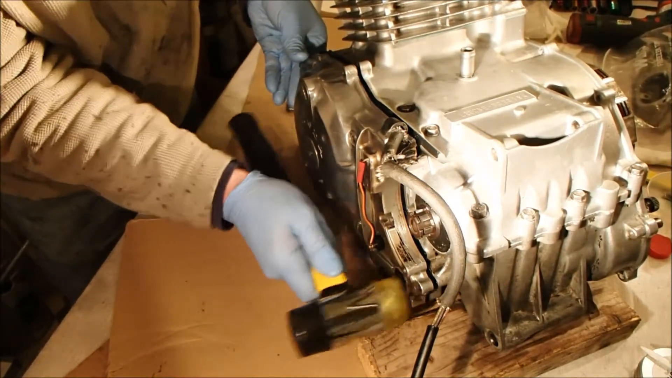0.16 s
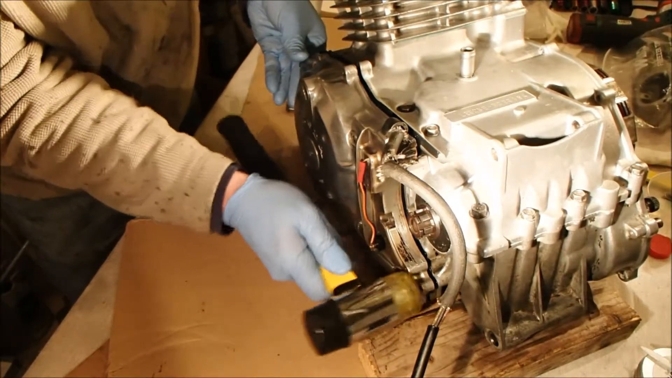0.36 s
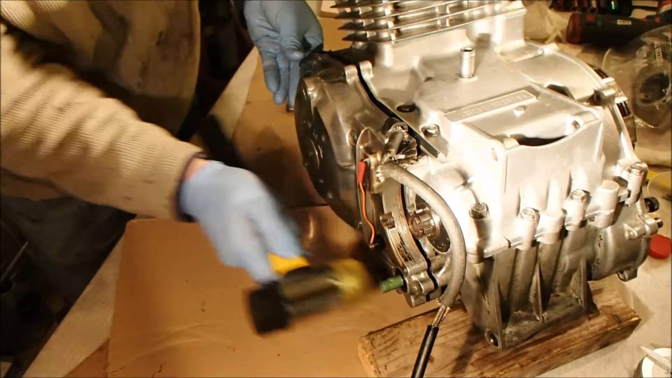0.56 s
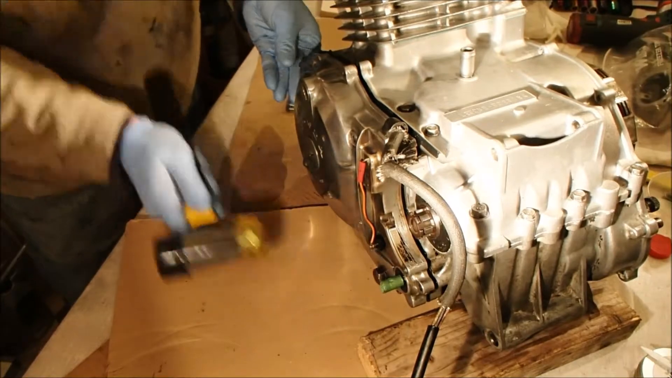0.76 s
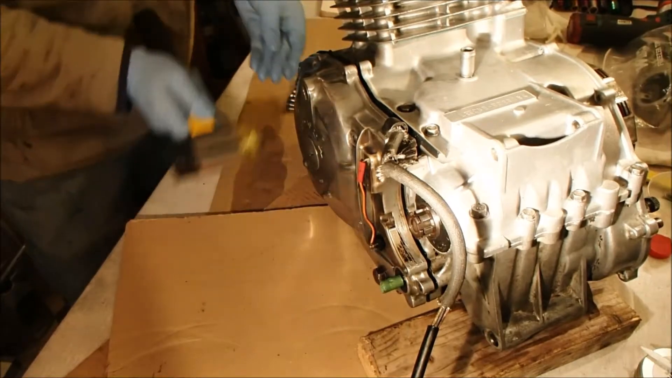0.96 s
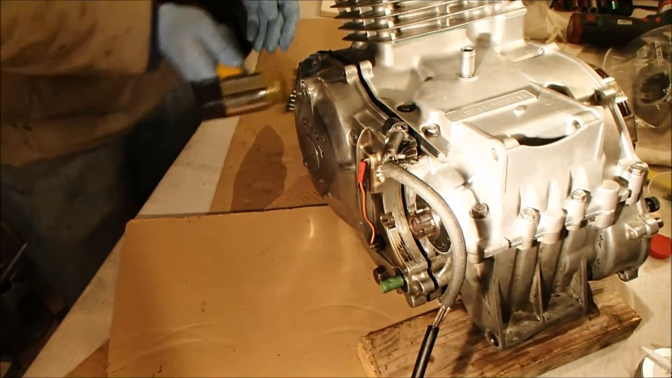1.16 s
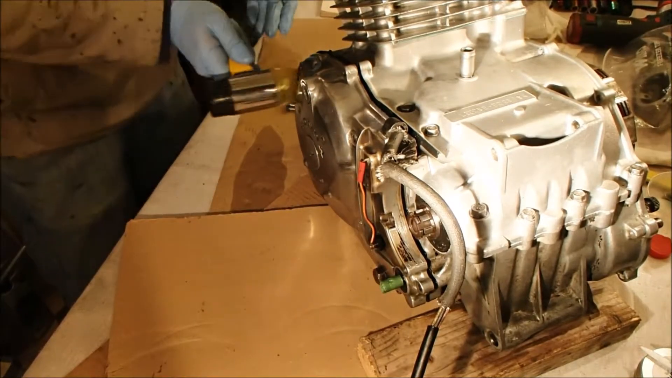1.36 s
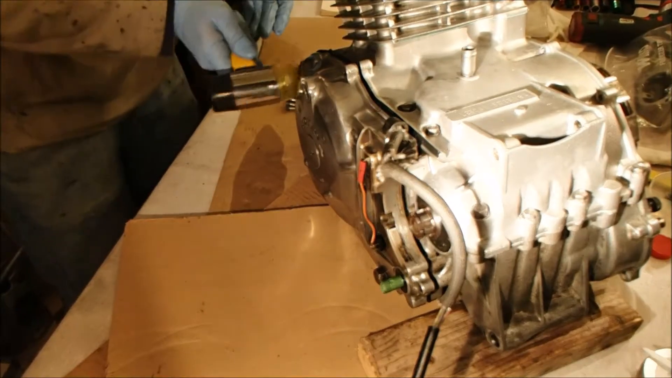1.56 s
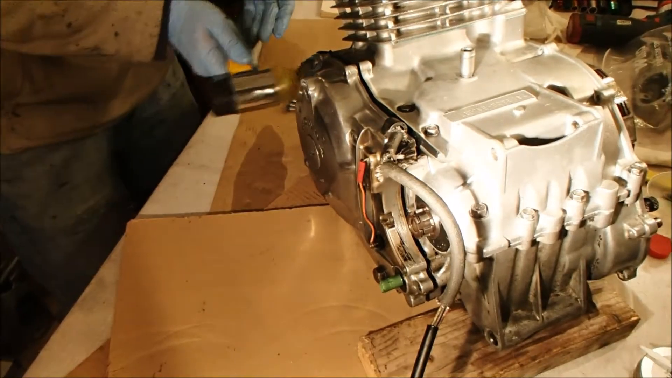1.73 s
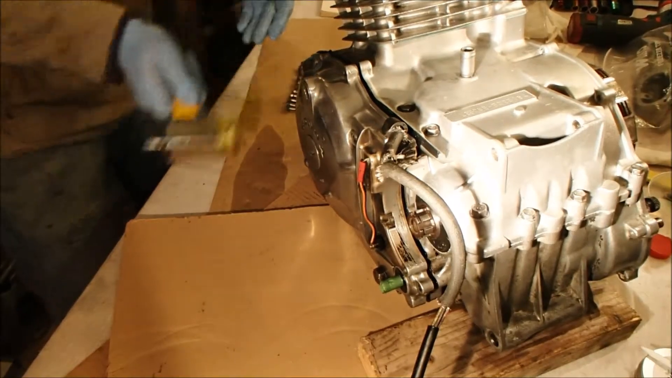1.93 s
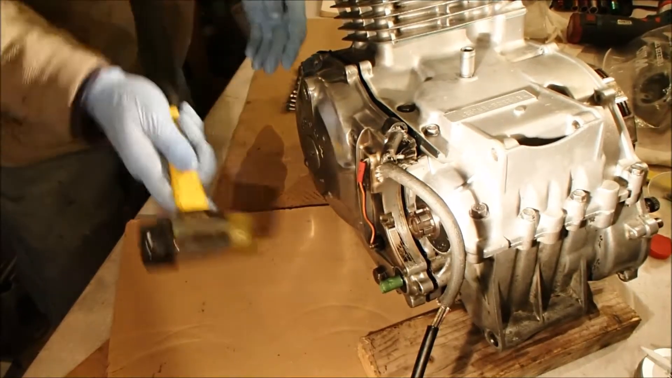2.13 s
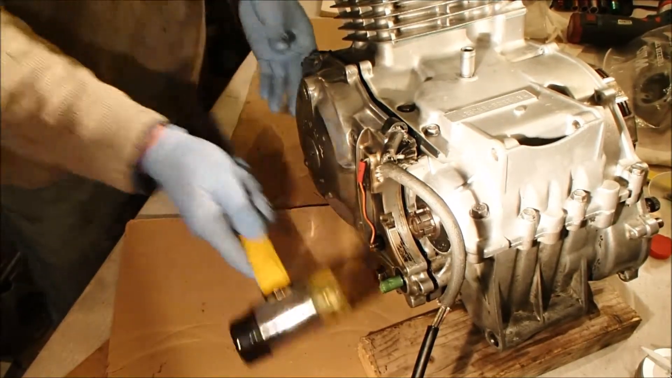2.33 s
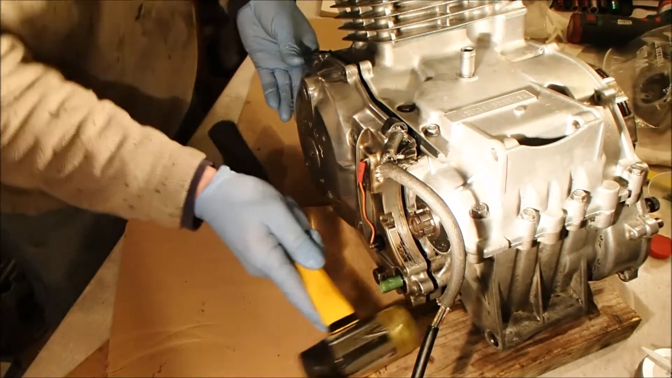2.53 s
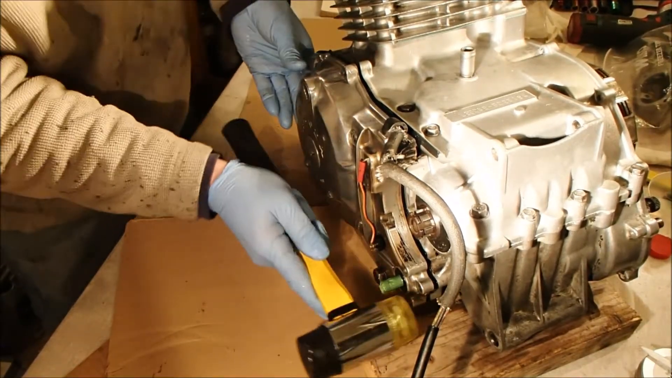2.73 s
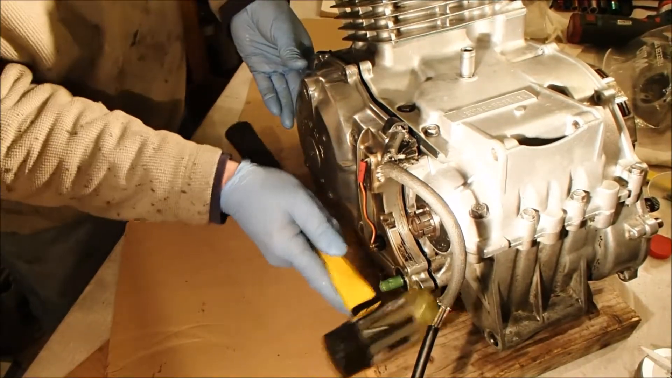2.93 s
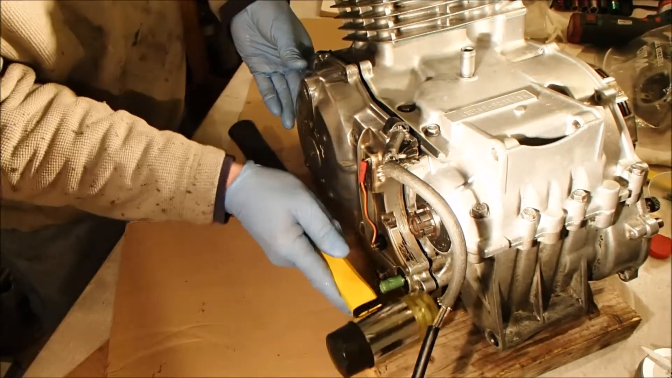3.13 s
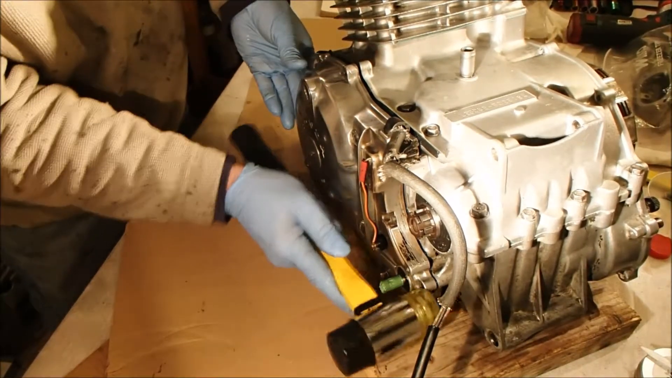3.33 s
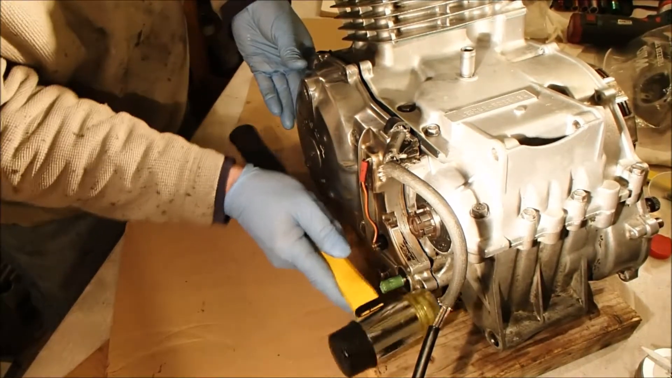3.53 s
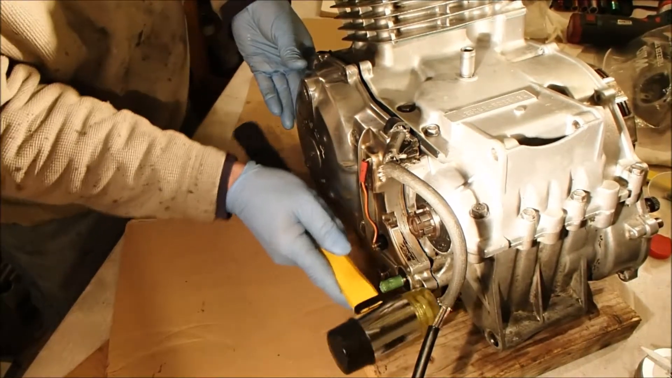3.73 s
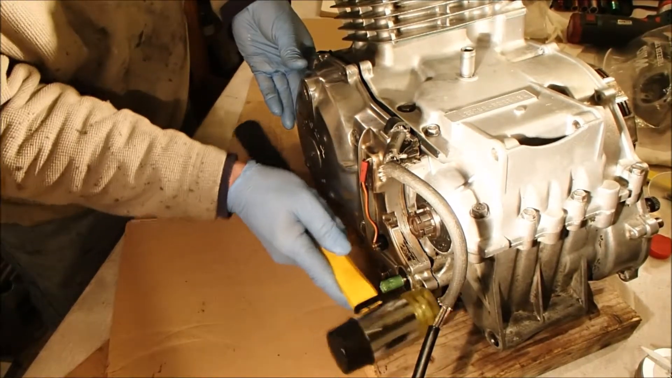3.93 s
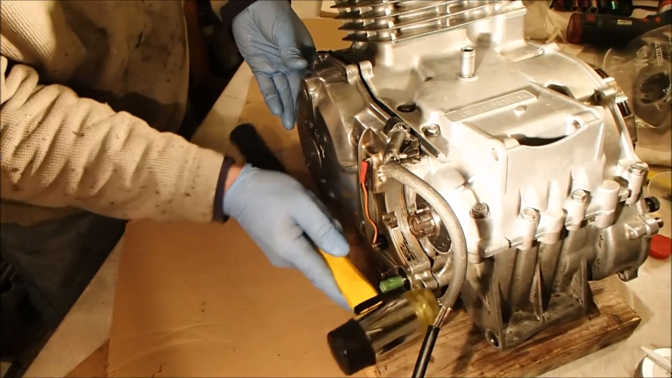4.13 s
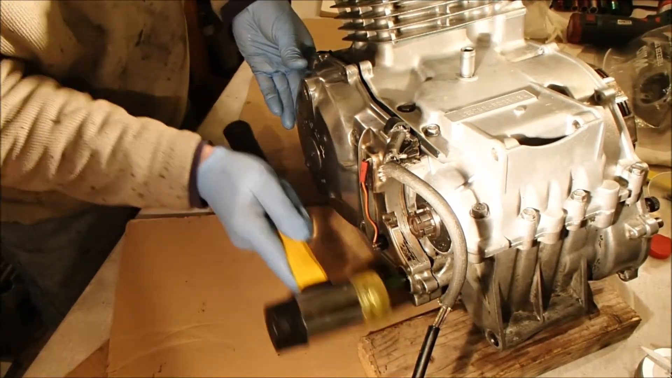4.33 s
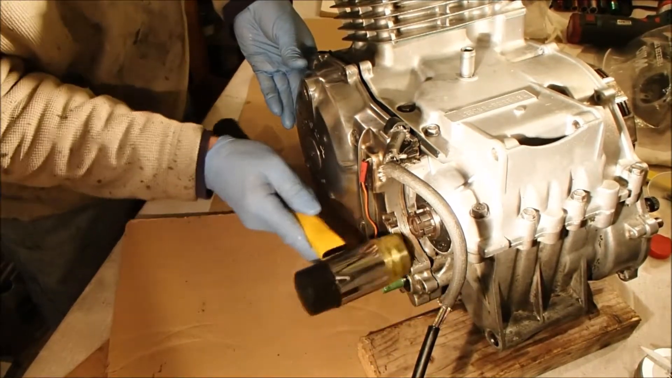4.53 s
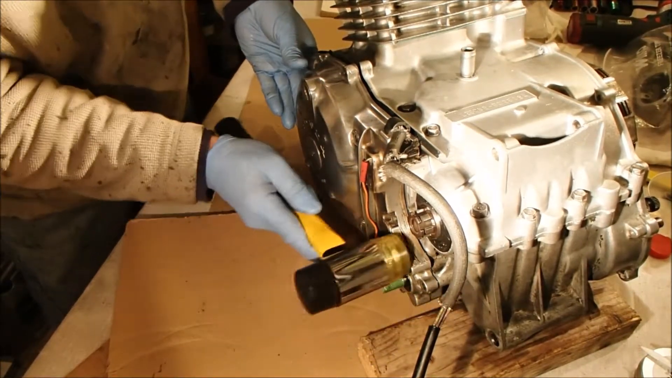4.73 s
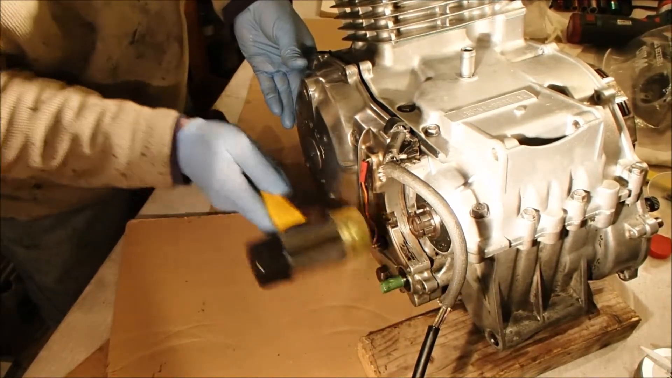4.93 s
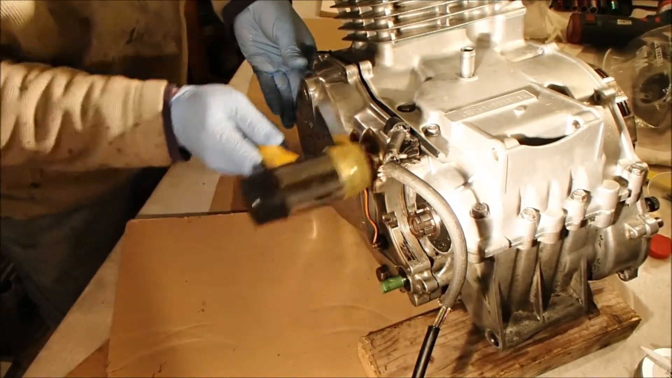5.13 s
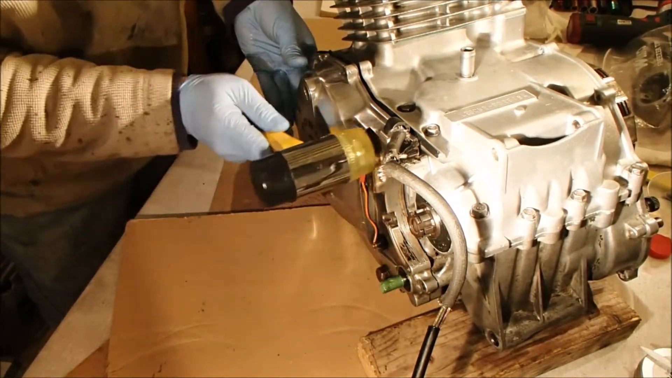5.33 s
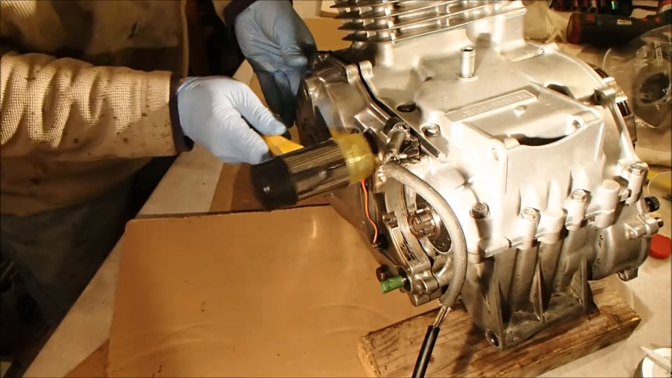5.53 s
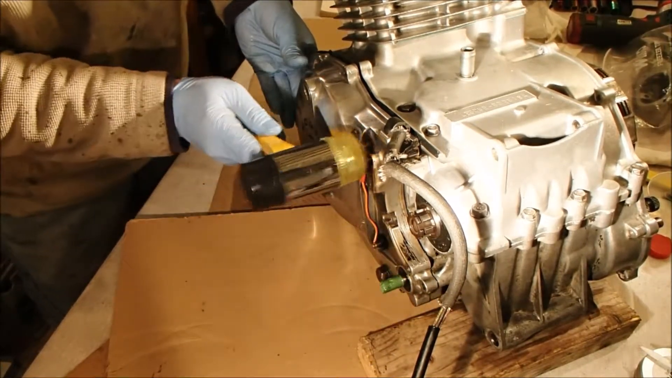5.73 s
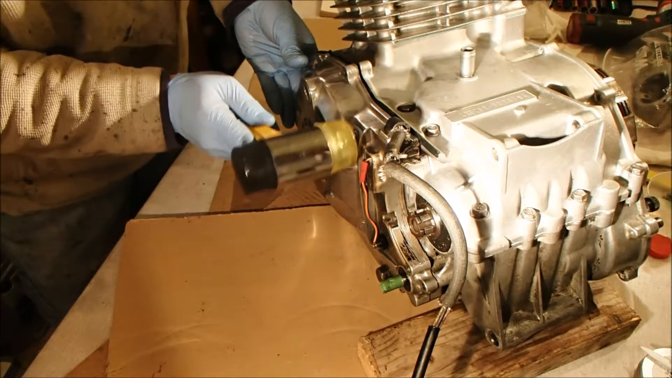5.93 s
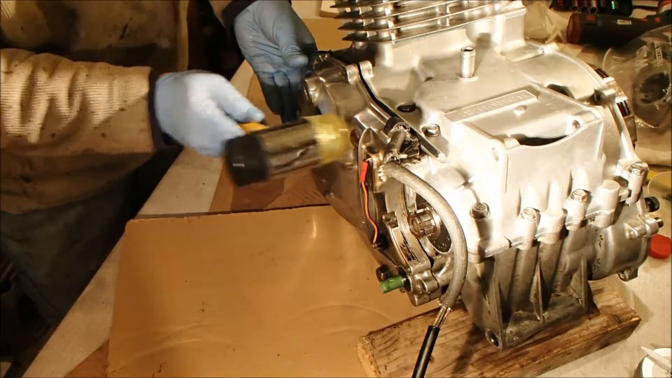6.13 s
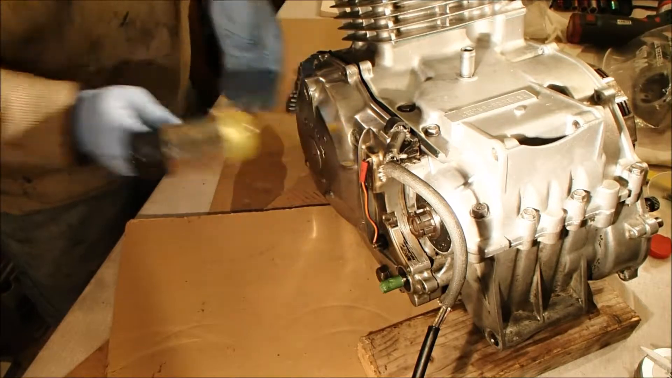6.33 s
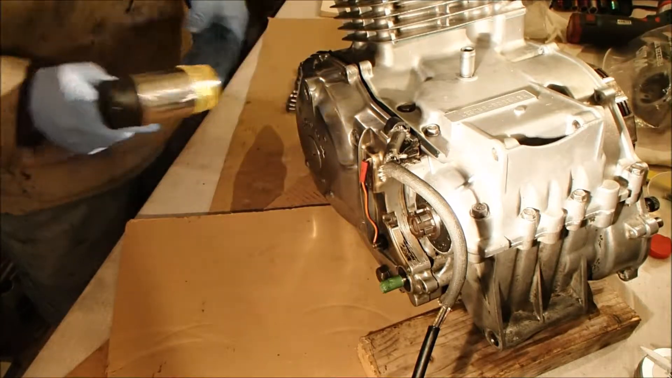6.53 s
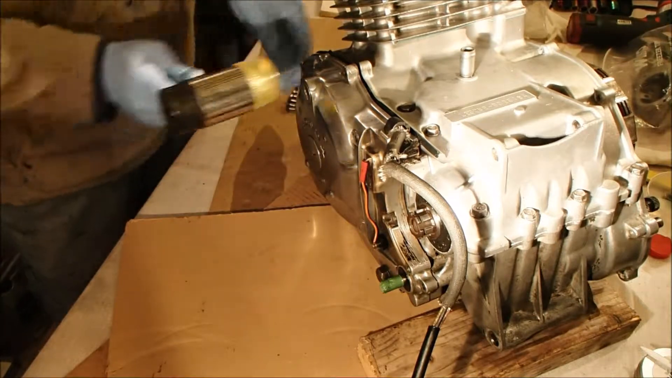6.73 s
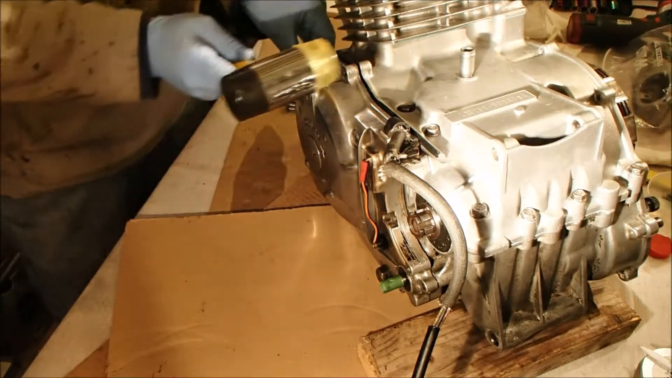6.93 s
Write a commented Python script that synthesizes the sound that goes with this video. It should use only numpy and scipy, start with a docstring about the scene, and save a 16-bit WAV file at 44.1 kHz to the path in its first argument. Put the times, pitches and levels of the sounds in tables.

```python
"""A small workshop: still air, faint mains hum and a thin top hiss run throughout, the hiss growing later on.
From the first instant a soft mallet knocks on the cast side cover of a motorcycle engine on a wooden bench.
Each blow is a swelling sine ping and a noisy crack, then decaying casting and bench modes with a dense ring.
From 0.4 s a loose part ticks between blows, as noise through short modes; from 1 s a glove brushes as shaped noise.
The hardest blows overload the microphone; loud sound pulls the level down, and it creeps back."""
import sys
import numpy as np
from scipy import signal
from scipy.fft import rfft, irfft
from scipy.io import wavfile
from scipy.ndimage import uniform_filter1d

SR = 44100
rng = np.random.default_rng(int(sys.argv[2]) if len(sys.argv) > 2 else 0)


def to_wav(sig):
    """Store sig (one row per channel, or 1-D mono) as 16-bit WAV at the path in sys.argv[1].

    Samples outside -1..1 are clipped; the rate is SR.
    """
    pcm = np.clip(np.atleast_2d(sig), -1, 1) * 32767
    pcm = np.round(pcm).astype(np.int16)
    wavfile.write(sys.argv[1], SR, pcm.T)  # frames by channels


N = 312228

# Still workshop air, spectrum shape: f/Hz, relative density/dB
AIR_SPECTRUM = [(25, -25), (60, -13.5), (125, -9.5), (280, -10.5), (420, -14.5), (900, -10.5), (1600, -17),
                (3300, -22), (4300, -29.5), (5400, -23.5), (7000, -27.5), (9500, -27.5), (15500, -32)]
# Mains hum: multiple of HUM_HZ, rms level/dB
HUM_PARTIALS = [(1, -58.5), (2, -84)]
# Thin high hiss, level over time: t/s, rms level/dB
HISS_LEVEL = [(0, -74), (4.7, -73), (5.2, -68), (7.08, -66.5)]
# Mallet blows; a firm face adds treble, a square landing adds ping:
# t/s, spot, strength/dB, treble/dB, ping level/dB
BLOWS = [(-0.024, "rim", -4, 2, -9), (0.224, "rim", 1, -1, -3.5), (1.1866, "rear", -1.5, 5, -5.5),
         (1.3842, "rear", 1.1, 2, -0.8), (1.5545, "rear", -1.4, 7.5, -0.7), (2.8171, "rim", 3.8, -8, -4),
         (3.053, "rim", 3.5, -3.5, -0.8), (3.2537, "rim", 4.1, -6, -0.1),
         (3.4733, "bottom", 1.5, -2.8, -0.6), (3.6729, "bottom", 4, -7.5, -7),
         (3.876, "front", 6, -1.3, -9), (4.069, "front", 3.5, -1.2, -5), (4.4683, "middle", 5, -0.4, -4.5),
         (4.7101, "middle", 5.5, -1.6, -6), (5.5455, "top", -5, -19.5, -1), (5.77, "top", -4, 5, 0.5),
         (5.979, "top", -4.5, 5.5, -2.5), (7.0536, "top", -2, -3, -1.7)]
# Spots of the cover, each lifting or dulling one band of the ring:
# spot, ping f/Hz, ping swell/s, crack level/dB, band f/Hz, band gain/dB
COVER_SPOTS = [("rim", 1370, 0.00073, -0.8, 1980, 2.7), ("rear", 1420, 0.00044, -5.5, 1370, 5.7),
               ("bottom", 1363, 0.00076, -3, 960, 4.3), ("front", 1370, 0.00069, -5.5, 1140, -5.5),
               ("middle", 1400, 0.00065, 3.9, 3200, 5), ("top", 1084, 0.0009, -4.1, 700, 9.1)]
# Contact crack, spectrum: f/Hz, gain/dB
CRACK_SPECTRUM = [(60, 0), (400, 1.5), (1000, 11.5), (2500, 12), (3600, 9), (4400, 2), (5500, 6),
                  (8000, -11), (15000, -24)]
# Modes of the engine casting: f/Hz, t60/s, then relative level/dB for each of COVER_SPOTS in order
ENGINE_MODES = [(213, 0.345, -49, -29, -38, -63, -50, -27), (241, 0.23, -24.5, -21, -20.5, -46, -36.5, -20),
                (274.3, 0.076, -12.5, -10.5, -16, -29, -30.5, -14),
                (290.6, 0.15, -20.5, -52, -18.5, -15.5, -19.5, -18.5),
                (344.3, 0.25, -36, -26, -28, -26.5, -33, -35.5),
                (461.6, 0.14, -36, -18.5, -27, -25, -28.5, -21.5),
                (491, 0.22, -37, -22, -24, -35, -29, -27.5), (554, 0.31, -62, -29, -49, -52, -42, -38),
                (616, 0.15, -26, -17, -34, -23.5, -32, -27.5),
                (735, 0.067, -47, -15, -55.5, -50.0, -46, -56), (810, 0.13, -69, -39, -15, -53, -23.5, -34),
                (848.5, 0.15, -25.5, -19.5, -17.5, -23, -28.5, -36),
                (898, 0.044, -12, -52, -14.5, -11.5, -22.5, -48),
                (880, 0.28, -33, -44, -36, -54, -32.5, -37), (1049, 0.32, -36, -46, -44, -52, -37, -32.5),
                (1124, 0.11, -27.5, -60, -45, -18.5, -31, -29.5),
                (1230, 0.27, -47, -52, -35, -55, -36.5, -32.5),
                (1279, 0.16, -25, -27, -41, -22.5, -26, -64), (1304, 0.17, -29, -26.5, -43, -56, -47, -43),
                (1382, 0.11, -26, -25, -26, -48, -31.5, -47), (1440, 0.14, -53, -24, -44, -50, -44, -50),
                (1555, 0.17, -57, -34, -48, -44, -58, -29), (1718, 0.24, -37, -38, -51, -34, -34.5, -34),
                (2113, 0.052, -31, -47, -28, -17, -62, -33), (2240, 0.008, -52, 3, -23, -18, -48, 5),
                (2290, 0.11, -36, -26, -40, -29, -42.5, -34), (2520, 0.12, -37, -20.5, -27, -40, -46, -52),
                (2800, 0.1, -45, -42, -44, -24, -34, -55), (3113, 0.16, -56, -56, -48, -45.1, -30.5, -55),
                (3830, 0.054, -50.0, -50.0, -57, -18, -37, -61)]
# Modes of the bench beneath: f/Hz, t60/s, level/dB
BENCH_MODES = [(44.2, 0.77, -40), (61.7, 0.55, -32), (103.3, 0.48, -30), (124.1, 0.56, -28.5)]
# Crowd of weaker modes and room reflections, starting spectrum: f/Hz, relative level/dB
DENSE_SPECTRUM = [(30, -69), (100, -0.5), (170, -14), (280, -2), (450, -19.5), (900, -7.5), (1400, -10),
                  (2000, -13), (3600, -16), (4400, -30), (5500, -27.5), (7000, -39), (9000, -50),
                  (15000, -48.5)]
# How long that crowd rings: f/Hz, t60/s
DENSE_DECAY = [(50, 0.41), (125, 0.45), (250, 0.19), (500, 0.29), (1000, 0.17), (2500, 0.16), (6000, 0.16),
               (10000, 0.11)]
# What passes from the soft face into the ring: f/Hz, gain/dB
FACE_RESPONSE = [(100, -1.53), (280, -0.12), (750, -2), (1400, 1.5), (1700, -0.5), (1880, -3), (2100, -1),
                 (3000, -3.5), (5500, 2.5)]
# Ticks of the loose part: t/s, peak level/dB
TICKS = [(.447, -43), (1.509, -33), (1.75, -28.5), (1.823, -32), (1.843, -41)]
# Modes of the loose part: f/Hz, t60/s, relative level/dB
LOOSE_MODES = [(450, 0.31, -25.5), (560, 0.029, -9), (820, 0.018, -3.5), (1650, 0.0088, 4),
               (2120, 0.0082, 3), (2580, 0.012, -10)]
# Glove and sleeve strokes: t/s, length/s, level/dB
BRUSHES = [(1.047, .16, -52.5), (2.06, 0.25, -53.5), (2.273, 0.11, -56.5)]
# Glove and sleeve rub, spectrum: f/Hz, gain/dB
CLOTH_SPECTRUM = [(100, -13), (900, 0), (2500, 2.5), (4300, 2.5), (5800, 6), (8000, -6), (15000, -8)]

HUM_HZ = 100
RING = np.arange(SR * 3 // 4) / SR  # time since a blow or tick, s
BAND_OCTAVES = 1.13  # half width of a spot's band
PING_OCTAVES_PER_DB = 0.0448  # a stronger, firmer blow pings higher
TILT_FROM_HZ, TILT_TO_HZ = 280, 5500  # firmness tilts the spectrum between these
THUMP_HZ, THUMP_SHARE = 101.4, 0.59  # the heavy bench follows only this share of the strength in dB


def amp(db):
    """Decibels to gain."""
    return 10 ** (np.asarray(db) / 20)


def evened(x):
    """Scales to an rms of one."""
    return x / np.sqrt(np.mean(x ** 2) + 1e-20)


def read(points, hz):
    """Reads (f/Hz, value) points on a log-frequency axis."""
    f, value = np.transpose(points)
    return np.interp(np.log(hz + 1), np.log(f + 1), value)


def add(mix, s, sound):
    """Mixes a sound in from time s on; a start before zero loses its head."""
    start = round(s * SR)
    sound = sound[max(-start, 0):]
    part = mix[max(start, 0):][:len(sound)]
    part += sound[:len(part)]


def tinted(x, points):
    """Gives steady noise a spectrum of (f/Hz, gain/dB) points."""
    gain = amp(read(points, np.fft.rfftfreq(len(x), 1 / SR)))
    return irfft(rfft(x) * gain, len(x))


def coloured(x, points, size=4096):
    """Minimum-phase filter through (f/Hz, gain/dB) points, so that attacks stay sharp."""
    log_gain = np.log(amp(read(points, abs(np.fft.fftfreq(size, 1 / SR)))))
    spectrum = np.exp(np.conj(signal.hilbert(log_gain)))
    taps = np.fft.ifft(spectrum).real[:size // 2]
    return signal.fftconvolve(x, taps)[:len(x)]


def modes(rows, rise_s):
    """Sines from (f/Hz, t60/s, level/dB) rows that build up quickly and die away."""
    tones = np.zeros(len(RING))
    for hz, t60, db in rows:
        decay = np.exp(-np.log(1000) * RING / t60)
        tones += amp(db) * decay * np.sin(2 * np.pi * hz * RING)
    return tones * (1 - np.exp(-RING / rise_s))


def workshop(air_db=-53.5, hiss_hz=12700, hiss_width_hz=750):
    """Still air as tinted noise, mains hum as sines and a thin hiss as a narrow band of noise at the very top."""
    t, hz = np.arange(N) / SR, np.fft.rfftfreq(N, 1 / SR)
    air = amp(air_db) * evened(tinted(rng.standard_normal(N), AIR_SPECTRUM))
    hum = np.zeros(N)
    for multiple, db in HUM_PARTIALS:
        angle = 2 * np.pi * (multiple * HUM_HZ * t + rng.random())
        hum += amp(db) * evened(np.sin(angle))
    hiss_band = np.exp(-((hz - hiss_hz) / hiss_width_hz) ** 2 / 2)
    hiss = evened(irfft(rfft(rng.standard_normal(N)) * hiss_band, N))
    hiss_gain = amp(np.interp(t, *np.transpose(HISS_LEVEL)))
    return air + hum + hiss * hiss_gain


def ping(hz, swell_s, overtone=1.874, overtone_db=-17, linger_db=-24, linger_s=0.0032):
    """The cover under the mallet face swings up fast, with one overtone, and is damped almost at once."""
    u = RING / swell_s
    linger = amp(linger_db) * (1 - np.exp(-u)) * np.exp(-RING / linger_s)
    swing = u * np.exp(1 - u) + linger
    angle = 2 * np.pi * hz * RING
    return swing * (np.sin(angle) + amp(overtone_db) * np.sin(overtone * angle))


def crack(length_s=.0006, snap=1.86, level_db=-12):
    """The face snaps against the metal (one impulse) and chatters for a few milliseconds (noise)."""
    u = RING / length_s
    chatter = rng.standard_normal(len(RING)) * u * np.exp(1 - u)
    contact = chatter + snap * signal.unit_impulse(len(RING), round(length_s * SR))
    return amp(level_db) * coloured(contact, CRACK_SPECTRUM)


def engine_and_bench(spot_index, casting_db=3.0):
    """The casting rings with the modes that this spot reaches, and rocks the bench beneath it."""
    reached = [(hz, t60, spot_db[spot_index]) for hz, t60, *spot_db in ENGINE_MODES]
    casting = amp(casting_db) * modes(reached, rise_s=0.0047)
    return casting + modes(BENCH_MODES, rise_s=0.0079)


def dense_ring(spot_noise, likeness=0.56, rise_s=0.0011, level_db=2.5, late_db=-23, late_stretch=2.9):
    """Countless weak modes and reflections, partly alike for blows on one spot; each pitch has its own decay."""
    fresh_noise = rng.standard_normal(len(RING))
    noise = likeness * spot_noise + np.sqrt(1 - likeness ** 2) * fresh_noise
    hz, t, z = signal.stft(tinted(noise, DENSE_SPECTRUM), SR, nperseg=512)
    fade = np.log(1000) * t / read(DENSE_DECAY, hz)[:, None]
    late = amp(late_db) * np.exp(-fade / late_stretch)  # the far room lingers faintly
    ring = signal.istft(z * (np.exp(-fade) + late), SR)[1][:len(RING)]
    return amp(level_db) * ring * (1 - np.exp(-RING / rise_s))


def blow(spot, tones, spot_noise, strength_db, treble_db, ping_db):
    """Ping and crack at the contact, then the ring of the spot; strength and firmness shape all three."""
    _, ping_hz, swell_s, crack_db, band_hz, band_db = spot
    push = [(THUMP_HZ, THUMP_SHARE * strength_db),
            (TILT_FROM_HZ, strength_db),
            (TILT_TO_HZ, strength_db + treble_db)]
    band = [(band_hz * 2 ** (side * BAND_OCTAVES), band_db * (1 - abs(side))) for side in (-1, 0, 1)]
    pitch = ping_hz * 2 ** (PING_OCTAVES_PER_DB * read(push, ping_hz))
    through_face = coloured(tones + dense_ring(spot_noise), FACE_RESPONSE)
    ring = coloured(through_face, band)
    contact = amp(ping_db) * ping(pitch, swell_s) + amp(crack_db) * crack()
    return coloured(contact + ring, push)


def mallet():
    """The mallet works its way around the cover; blows on one spot wake the same modes."""
    spots = {}
    for k, spot in enumerate(COVER_SPOTS):
        spots[spot[0]] = (spot, engine_and_bench(k), rng.standard_normal(len(RING)))
    out = np.zeros(N)
    for s, name, strength_db, treble_db, ping_db in BLOWS:
        add(out, s, blow(*spots[name], strength_db, treble_db, ping_db))
    return out


def loose_part(chatter_s=0.00026):
    """A loose part chatters briefly against its seat: a noise burst excites its short modes."""
    ring = modes(LOOSE_MODES, rise_s=0.0022)
    out = np.zeros(N)
    for s, db in TICKS:
        chatter = rng.standard_normal(len(RING)) * np.exp(-RING / chatter_s)
        tick = signal.fftconvolve(ring, chatter)
        add(out, s, amp(db) * tick / abs(tick).max())
    return out


def glove(grain_db=2.5, grain_samples=300):
    """Soft swishes of rubber and cloth: tinted noise made uneven by a slow random grain."""
    grain = evened(uniform_filter1d(rng.standard_normal(N), grain_samples))
    rub = evened(tinted(rng.standard_normal(N), CLOTH_SPECTRUM) * amp(grain_db * grain))
    stroke = np.zeros(N)
    for s, length_s, db in BRUSHES:
        add(stroke, s, amp(db) * np.sqrt(np.hanning(round(length_s * SR))))
    return rub * stroke


def scene():
    """Everything at one close microphone."""
    return (workshop() + mallet() + loose_part() + glove())[None]


def record(dry, threshold_db=-20, squeeze=0.43, recover_db_per_s=24, react_s=0.0044, edge_hz=16100):
    """Peaks clip at full scale; gain control dips on loud sound and creeps back; then the band limit."""
    clipped = np.clip(dry[0], -1, 1)
    keep = np.exp(-1 / (react_s * SR))
    smoother = [1 - keep], [1, -keep]
    power_db = 10 * np.log10(signal.lfilter(*smoother, clipped ** 2) + 1e-12)
    wanted_db = squeeze * np.maximum(power_db - threshold_db, 0)
    # a running maximum on a rising ramp lets the dip recover at a steady rate
    recovery = recover_db_per_s * np.arange(N) / SR
    duck_db = np.maximum.accumulate(wanted_db + recovery) - recovery
    ducked = clipped / amp(signal.lfilter(*smoother, duck_db))
    lowpass = signal.firwin(255, edge_hz, window=("kaiser", 8), fs=SR)
    return signal.oaconvolve(ducked, lowpass, "same")[None]


dry = scene()
out = record(dry)
to_wav(out)
```